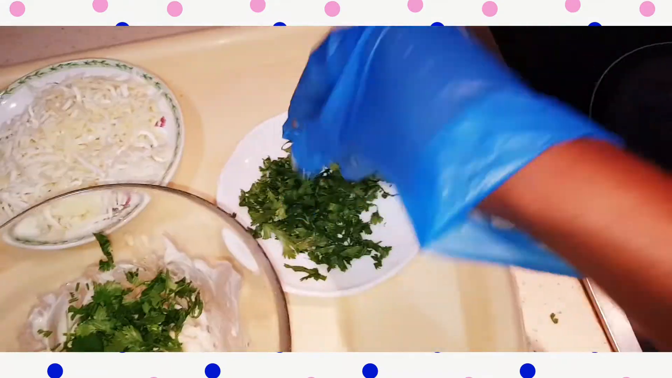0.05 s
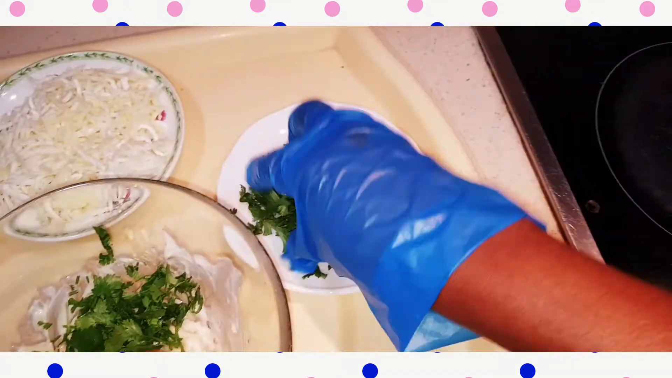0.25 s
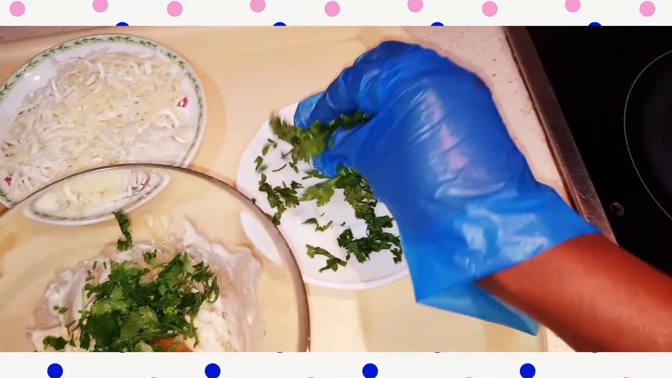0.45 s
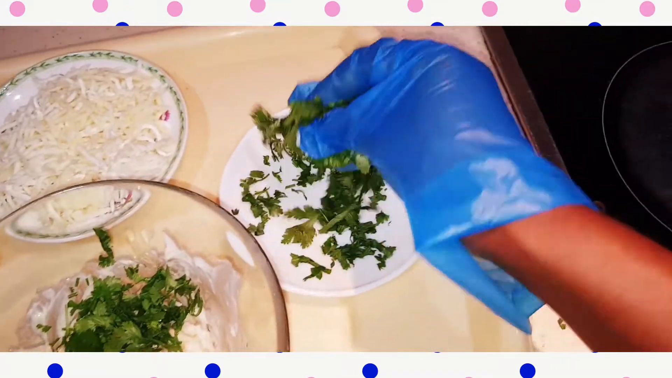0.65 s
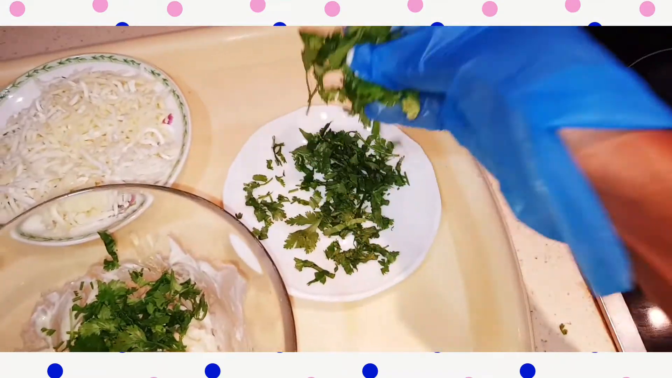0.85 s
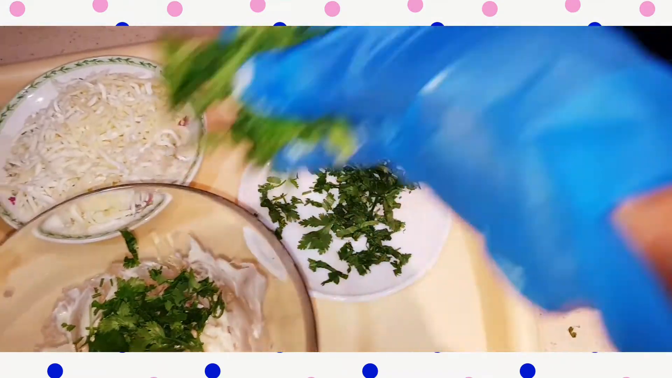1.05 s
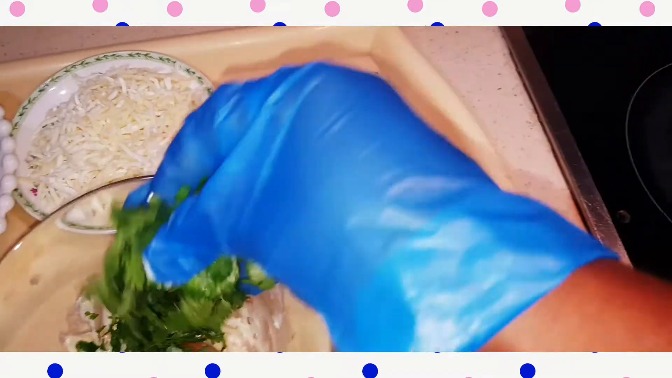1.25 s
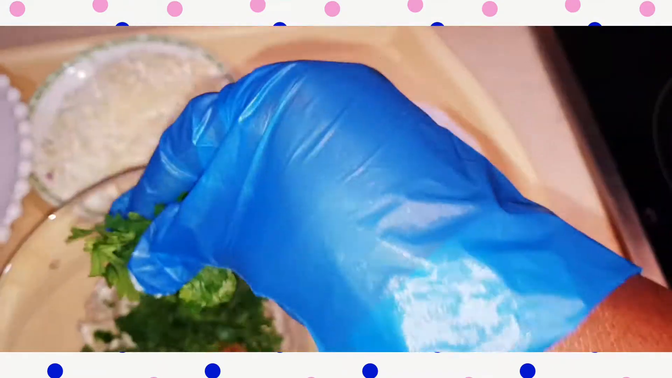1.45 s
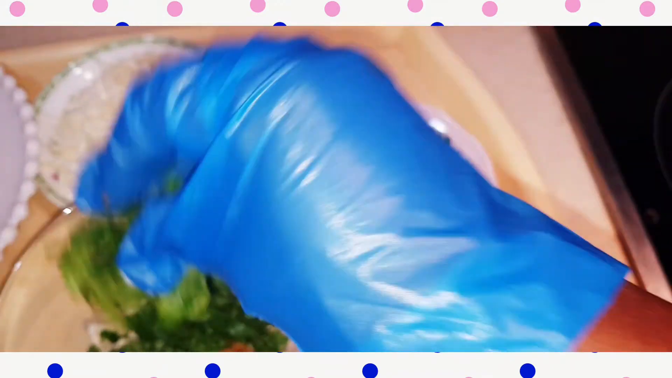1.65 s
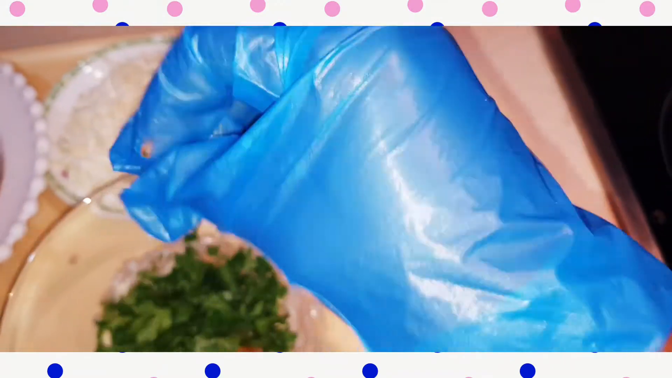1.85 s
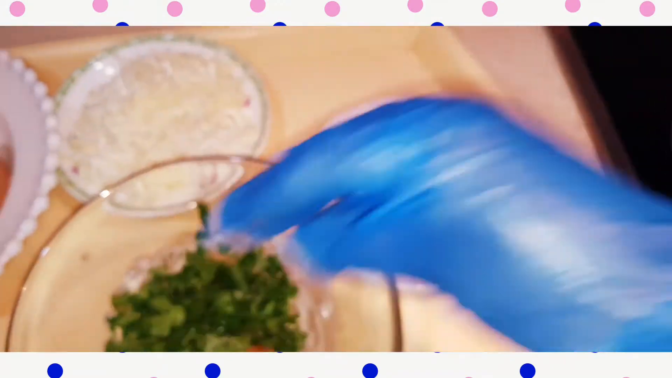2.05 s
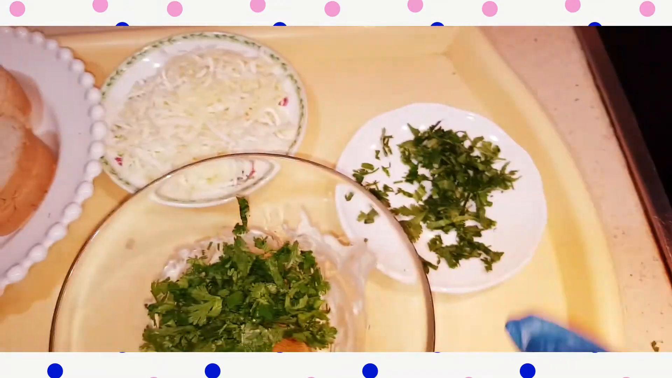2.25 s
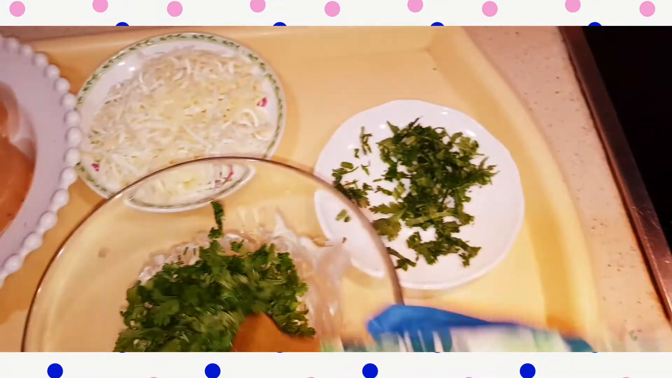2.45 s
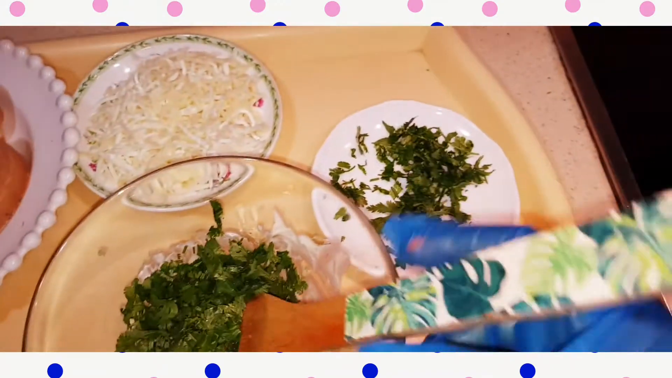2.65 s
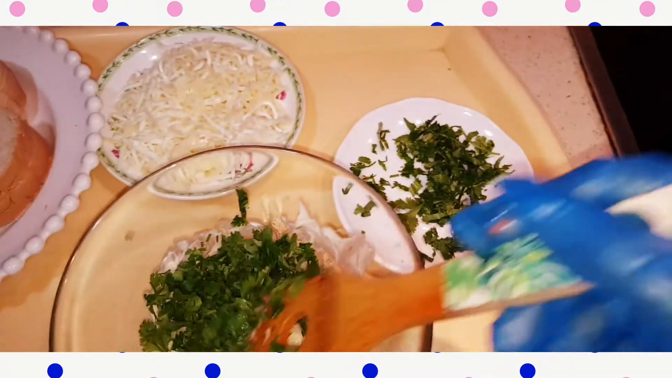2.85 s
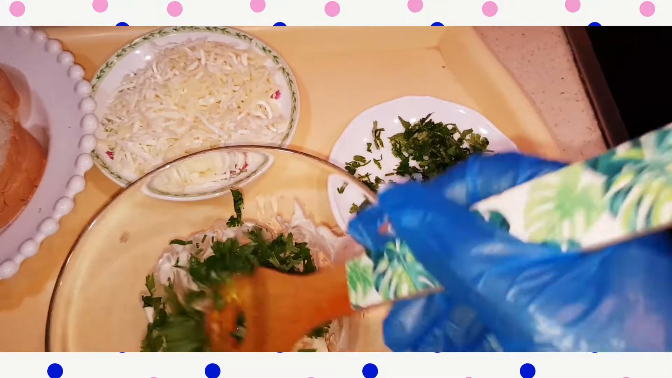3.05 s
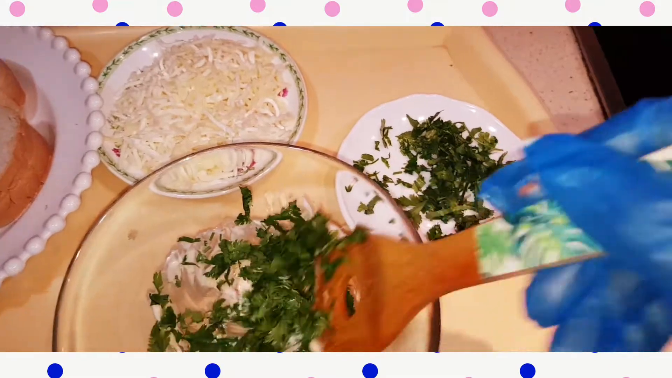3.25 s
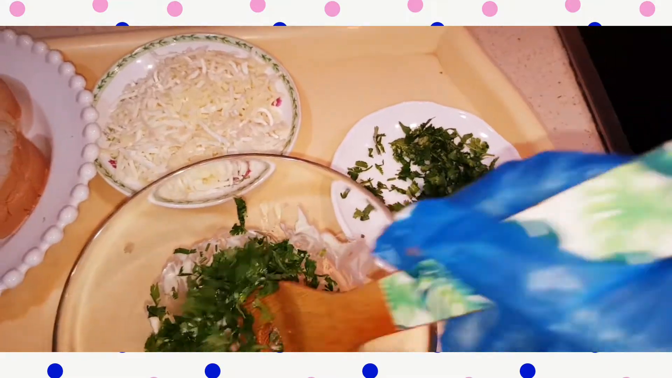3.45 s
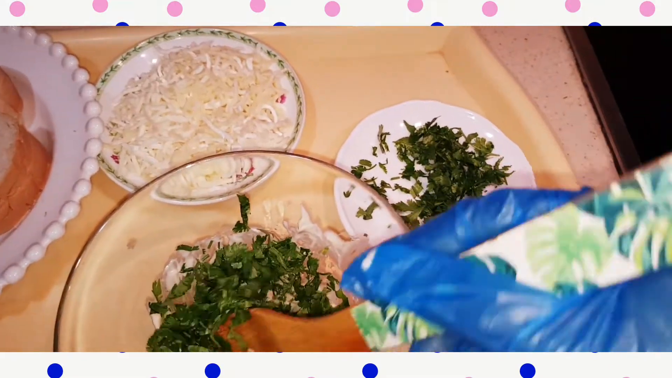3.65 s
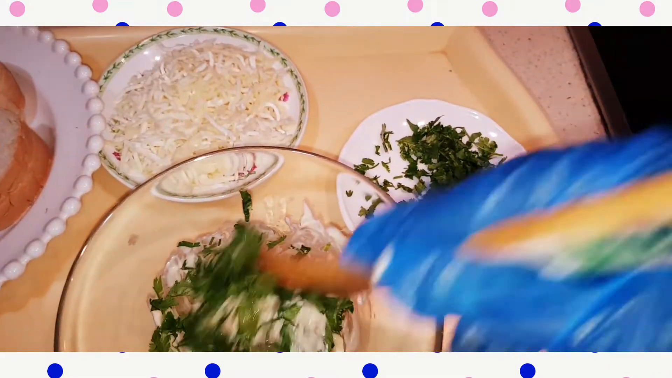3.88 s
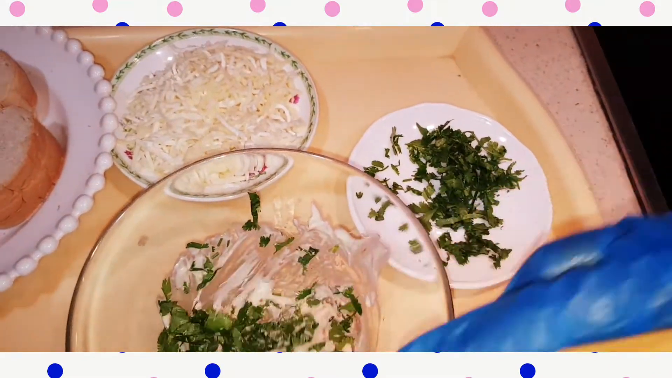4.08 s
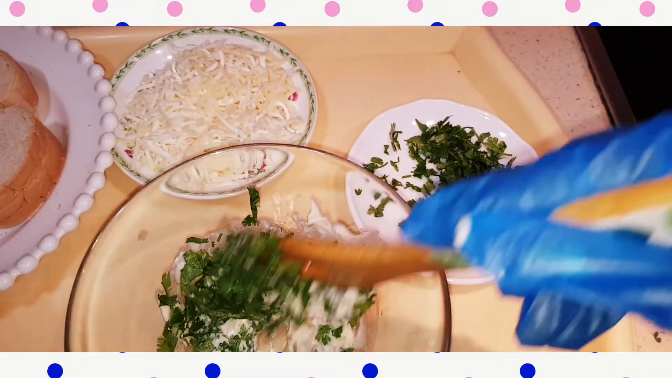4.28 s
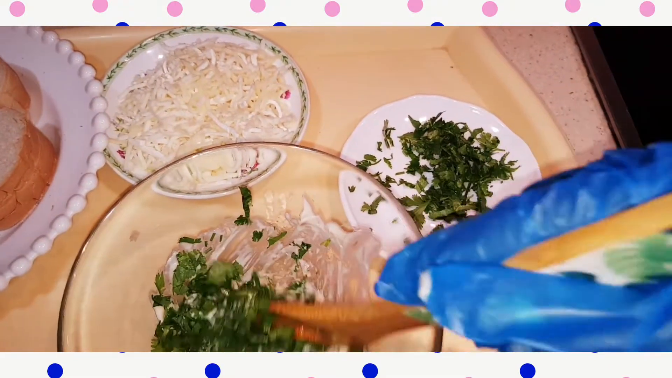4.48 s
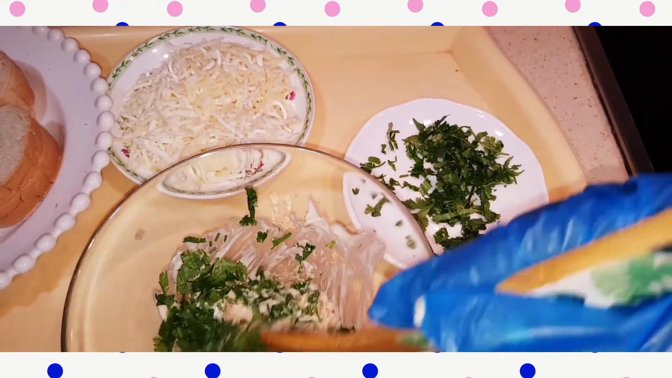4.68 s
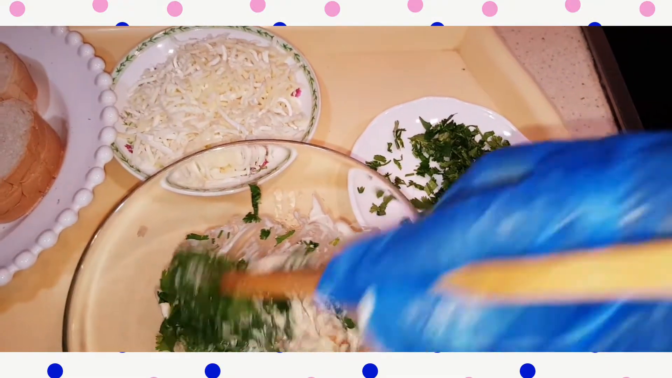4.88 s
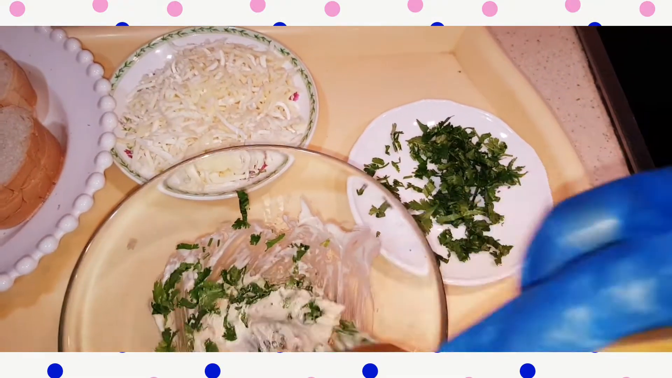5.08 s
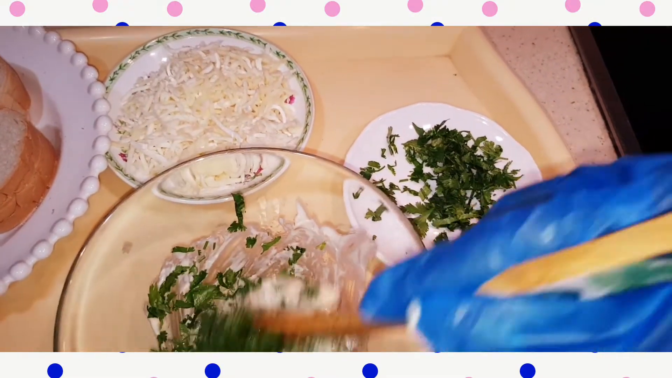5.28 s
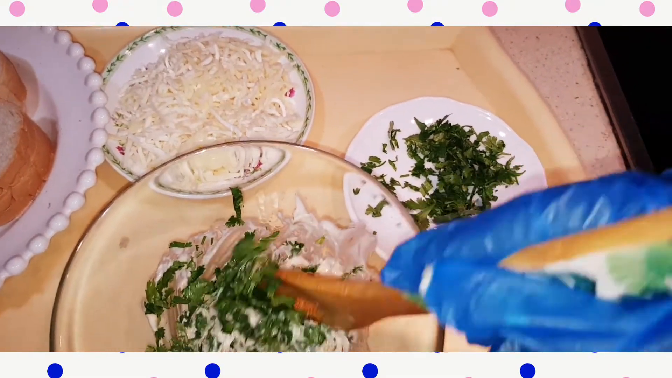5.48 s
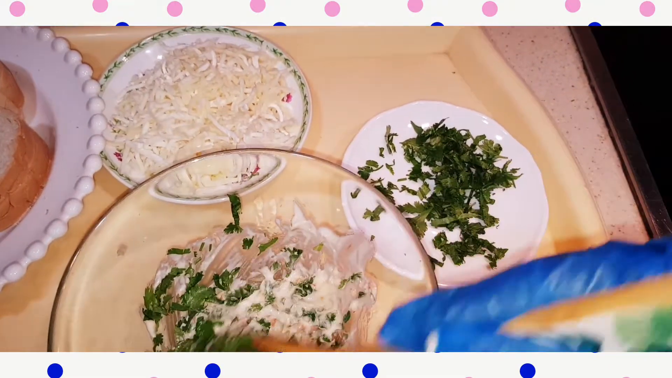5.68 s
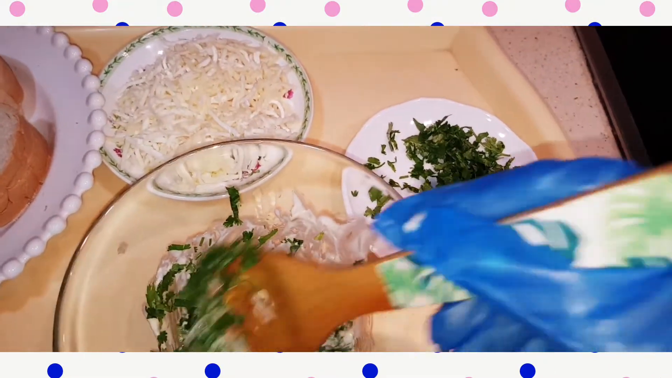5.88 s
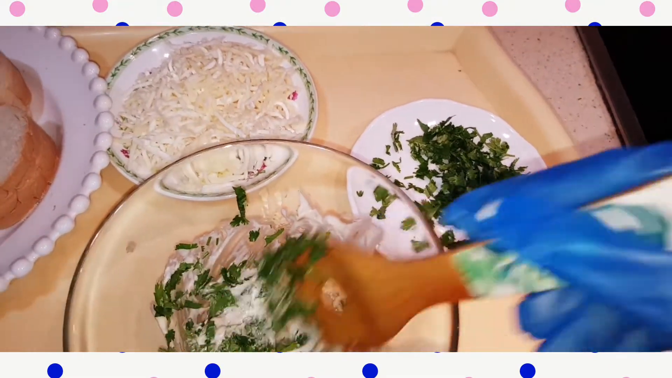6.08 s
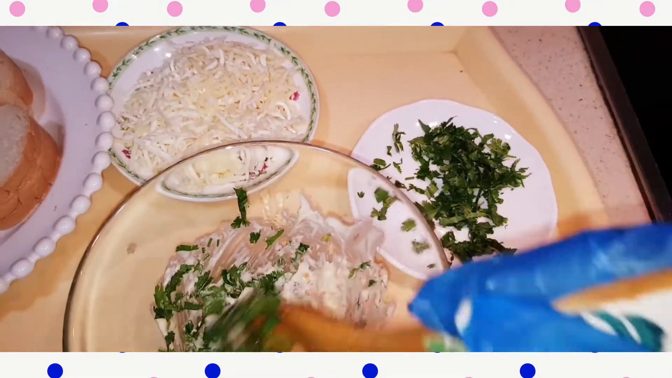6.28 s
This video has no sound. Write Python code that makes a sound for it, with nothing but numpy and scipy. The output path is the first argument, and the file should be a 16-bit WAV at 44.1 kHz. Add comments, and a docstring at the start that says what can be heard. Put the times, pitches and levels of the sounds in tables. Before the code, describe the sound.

In a small kitchen with a faint appliance hum, a plastic glove rustles near the microphone, slightly to the left, handling herbs. Then a wooden spatula knocks irregularly against a glass bowl as it works through a thick mixture. The first strokes bring short ringing clinks; the later ones are mostly lighter taps and thuds, mixed with soft rubbing and small crackles from the glove.

```python
"""Herbs stirred in a glass bowl

A gloved hand drops herbs into a glass bowl, then stirs a thick mix with a wooden spatula. The blade
thuds on the loaded bowl, the handle taps the rim, the bare rim rings until the spatula damps it.
The plastic glove rustles and snaps, fingers brush a saucer; an appliance hums across the small kitchen."""
import sys
import numpy as np
from scipy import signal
from scipy.fft import rfft, irfft, next_fast_len
from scipy.io import wavfile
from scipy.ndimage import uniform_filter1d, map_coordinates

SR = 44100
rng = np.random.default_rng(int(sys.argv[2]) if len(sys.argv) > 2 else 0)


def inscribe(sig):
    """Save sig as 16-bit PCM at rate SR to the path in sys.argv[1].

    A 1-D sig is mono; a 2-D sig holds one channel per row.
    Samples are clipped to [-1, 1] before scaling.
    """
    pcm = np.round(np.clip(np.atleast_2d(sig).T, -1, 1) * 32767)
    wavfile.write(sys.argv[1], SR, pcm.astype(np.int16))


N = 279005
TIME_S = np.arange(N) / SR
STIR_S = 2.9  # spatula enters the mix

# Spatula contacts. Each row: start in seconds, thud in dB, tap in dB, thud pitch in Hz.
CONTACTS = [(2.943, -25, -15.5, 576), (3.2455, -11.5, -17.5, 568), (3.27, -25, -31, 570),
            (3.293, -35, -15, 525), (3.341, -27, -27, 605), (3.367, -32.5, -19, 720),
            (3.412, -32.5, -39, 605), (3.439, -36, -34, 553), (3.471, -40, -39, 613),
            (3.545, -32, -21.5, 1003), (3.592, -32, -14, 700), (3.637, -32.5, -37, 620),
            (3.662, -46, -23.5, 580), (3.667, -32, -39, 556), (3.708, -32, -44, 627),
            (3.738, -37, -31, 544), (3.763, -25.5, -6.5, 984), (3.855, -34, -53, 656),
            (3.879, -32, -15, 666), (3.931, -31.5, -31, 580), (3.948, -39, -27.5, 804),
            (3.997, -32.5, -38, 618), (4.027, -41, -32, 553), (4.077, -35.5, -31, 626),
            (4.117, -37, -19, 733), (4.184, -39, -22, 737), (4.266, -51, -30.5, 570),
            (4.316, -45.5, -27, 605), (4.349, -43, -39, 1015), (4.385, -51, -30, 740),
            (4.431, -40, -64, 616), (4.491, -45.5, -53, 596), (4.58, -39.5, -27.5, 536),
            (4.618, -37.5, -19, 730), (4.684, -47.5, -22, 564), (4.751, -50.5, -30.5, 566),
            (4.821, -41.5, -50, 536), (4.868, -51, -28.5, 560), (4.927, -49, -36, 775),
            (4.958, -47.5, -58, 616), (5.106, -40.5, -29.5, 950), (5.133, -30, -27, 628),
            (5.158, -37, -21.5, 750), (5.226, -39.5, -23, 720), (5.292, -45.5, -28, 757),
            (5.382, -41, -35, 553), (5.425, -34.5, -16, 735), (5.469, -28.5, -27.5, 622),
            (5.498, -40, -22.5, 546), (5.56, -58, -28.5, 557), (5.585, -25, -29, 560),
            (5.607, -28.5, -32, 680), (5.629, -40, -20.5, 546), (5.63, -23.5, -43, 552),
            (5.665, -25, -28, 640), (5.7, -30.5, -16.5, 556), (5.767, -47, -27.5, 780),
            (5.89, -55, -26, 750), (5.955, -65, -23.5, 540), (6.183, -38, -20, 734),
            (6.213, -41.5, -39, 610), (6.249, -43.5, -23.5, 575), (6.32, -51, -26, 570)]
# Glove creases. Each row: start in seconds, level in dB, pitch in Hz, left over right in dB.
SNAPS = [(0.161, -40, 6850, 5.0), (0.234, -39, 11600, -1), (0.5288, -40.5, 6300, 11),
         (0.629, -61.5, 2580, 18), (1.0091, -40.5, 6110, 12), (1.0793, -43, 4420, 14),
         (1.776, -38, 6300, 7), (1.795, -44, 6500, 12), (1.837, -38, 1700, 2), (1.8583, -37, 11200, 6.0),
         (2.048, -31.5, 12300, 2), (2.108, -38, 13500, 6), (2.13, -44, 5500, 7), (2.182, -41, 9500, 5),
         (2.2172, -30, 10100, -2), (2.273, -27.5, 4470, 0.0), (2.3015, -31, 6430, -1),
         (2.312, -39, 11000, -5), (2.373, -35.5, 4770, 3), (2.4007, -35, 6570, 0), (2.613, -37, 1830, 1),
         (2.62, -34, 1950, 4), (2.6162, -26, 13400, -4), (2.706, -35, 4960, 6), (2.9397, -35.5, 6200, 6),
         (3.0272, -47.5, 8000, 29), (3.2443, -22.5, 6180, 10), (3.279, -37.5, 4600, 4),
         (3.512, -45, 7260, 14), (3.545, -25.5, 4720, 17), (3.629, -36, 6300, 9), (3.654, -38, 13400, 18),
         (3.676, -43, 12900, 28), (3.728, -36.5, 7400, 10), (3.641, -35, 5400, 15), (3.686, -45, 8000, 15),
         (3.778, -45, 6900, 10), (4.016, -41.5, 13200, 38), (4.027, -41.5, 8050, 21),
         (4.167, -46, 5430, 16), (4.176, -42, 12600, 13), (4.1865, -38, 14700, 15), (4.205, -35, 14500, 30),
         (4.216, -35, 12300, 25), (4.2277, -42.5, 13000, 45), (4.2612, -30, 15100, 17),
         (4.2773, -32.5, 10600, 29), (4.2985, -38.5, 5960, 10), (4.3155, -38, 13500, 12),
         (4.311, -31, 14600, 12), (4.477, -43, 13300, 12), (4.576, -30.5, 5060, 11),
         (4.719, -40, 13600, 16), (4.8104, -44, 12350, 9.0), (4.969, -44, 12700, 24),
         (4.991, -37.5, 12200, 26), (5.106, -30, 6390, 13), (5.1562, -33, 4620, 12),
         (5.2046, -33.5, 12600, 18), (5.2195, -35, 14000, 20), (5.385, -37, 6740, 20),
         (5.4263, -36.5, 4730, 2), (5.4582, -34.5, 4800, 17), (5.463, -39.5, 8800, 18),
         (5.468, -27.5, 13100, 20), (5.5824, -41.5, 6070, 28), (5.7169, -37, 5580, 19),
         (5.775, -32.5, 15200, 17), (5.81, -37, 14100, 13), (5.928, -38, 9400, 3), (5.946, -42, 11900, 11),
         (5.966, -46, 6700, 6), (6.114, -36.5, 7700, 15)]
# Pushes through herbs and mix. Each row: start and length in seconds, rub in dB, glove drag in dB.
STROKES = [(1.746, 0.085, -61.5, -8), (2.018, 0.18, -65.5, -4), (2.275, 0.07, -55.5, -8),
           (2.388, 0.36, -65.5, -3), (2.959, 0.094, -53, -14), (3.224, .13, -59, -15.5),
           (3.51, 0.17, -56, -9), (3.765, 0.14, -52.5, -5.5), (4.028, 0.38, -61, -8),
           (4.576, 0.049, -64, 0), (4.795, 0.12, -57, -1.5), (5.103, 0.1, -57, 0.5), (5.34, 0.14, -63, -5),
           (5.569, 0.13, -57.5, -2), (5.814, 0.15, -64.5, 1), (6.118, 0.52, -63, -3.5)]
# Balance of glove and mix. Each row: frequency in Hz, left over right in dB.
HAND_PAN = [(60, 3.5), (240, 2.5), (950, 5), (3770, 3.5), (15000, 11)]


def amp(db):
    """dB to gain."""
    return 10 ** (np.asarray(db) / 20)


def unit(x):
    """Scale to rms 1."""
    return x / np.sqrt(np.mean(x ** 2) + 1e-20)


def along(points, hz):
    """Interpolate (Hz, value) points on a log frequency axis."""
    knots_hz, values = np.transpose(points)
    return np.interp(np.log(hz + 1), np.log(knots_hz + 1), values)


def pan_gains(db):
    """Left and right gains, db apart."""
    return amp(np.array([db / 2, -db / 2]))


def wobble(rate_hz):
    """Smooth random curve with knots at rate_hz."""
    return map_coordinates(rng.standard_normal(int(N * rate_hz / SR) + 4), [TIME_S * rate_hz])


def filtered(x, response):
    """Apply a complex response, a function of Hz."""
    size = next_fast_len(N + SR // 2)
    return irfft(rfft(x, size) * response(np.fft.rfftfreq(size, 1 / SR)), size)[..., :N]


def resonance(hz, centre_hz, width_hz):
    """Band-pass response of one mode."""
    return 1j * hz * width_hz / (centre_hz ** 2 - hz ** 2 + 1j * hz * width_hz)


def stereo(sources, spectrum, coherence, pan):
    """Mix two independent signals into a coloured stereo pair, mid at rms 1."""
    def colour(hz):
        angle = np.arccos(np.clip(along(coherence, hz), -1, 1)) / 2
        return amp(along(spectrum, hz)) * [np.cos(angle), np.sin(angle)]
    mid, side = filtered(np.array(sources), colour)
    both = filtered(np.array([mid + side, mid - side]), lambda hz: pan_gains(along(pan, hz)))
    return both / np.std(both.mean(axis=0))


def crackle(per_s, centre_hz, octaves, spread_db, grain_rms, cycles, samples):
    """White noise plus short wavelets of scattered pitch and level."""
    count = per_s * N // SR
    starts = (rng.random(count) * N).astype(int)
    gains = amp(spread_db * np.minimum(rng.exponential(size=count), 3.2))
    hz = np.clip(centre_hz * 2 ** (octaves * rng.standard_normal(count)), 300, 15500)
    turns = np.arange(samples) / SR * hz[:, None]
    wavelets = gains[:, None] * np.sin(2 * np.pi * turns) * turns ** 2 * np.exp(-2 * turns / cycles)
    index = starts[:, None] + np.arange(samples)
    grains = np.bincount(index.ravel(), wavelets.ravel(), N + SR)[:N]
    return grain_rms * unit(grains) + rng.standard_normal(N)


def ring(modes, t, scatter_db, detune):
    """Damped sines from (Hz, width Hz, dB) modes, level and pitch scattered, peak 1."""
    x = sum(amp(db + rng.normal(0, scatter_db)) * np.exp(-np.pi * width_hz * t)
            * np.sin(2 * np.pi * hz * rng.normal(1, detune) * t) for hz, width_hz, db in modes)
    return x / np.max(np.abs(x))


def trails(starts_s, levels_db, t60_s):
    """Power that jumps at each event and decays."""
    kicks = np.bincount((starts_s * SR).astype(int), amp(levels_db) ** 2, N)
    return signal.lfilter([1], [1, -amp(-120 / (t60_s * SR))], kicks)


def stroke_powers():
    """Rub power and glove drag power gain, summed over the pushes."""
    rise_db_per_s, fall_db_per_s = 518.5, 205.5
    start_s, length_s, rub_db, drag_db = np.transpose(STROKES)[:, :, None]
    shape_db = -rise_db_per_s * np.maximum(start_s - TIME_S, 0)
    shape_db -= fall_db_per_s * np.maximum(TIME_S - start_s - length_s, 0)
    return [np.sum(amp(db + shape_db) ** 2, axis=0) for db in (rub_db, drag_db)]


def add(track, start_s, sound):
    """Mix a sound into a stereo track."""
    track[:, round(start_s * SR):][:, :sound.shape[-1]] += sound


def kitchen_tail(samples):
    """Random stereo room response, energy about 1; each band decays at its own rate."""
    # Each row: frequency in Hz, T60 in seconds.
    decay = [(400, 0.12), (2000, 0.2), (8000, 0.055)]
    hz, t, bands = signal.stft(rng.standard_normal((2, samples)), SR, nperseg=256)
    tail = signal.istft(bands * amp(-60 * t / along(decay, hz)[:, None]), SR, nperseg=256)[1]
    return np.pad(tail / np.linalg.norm(tail[0]), ((0, 0), (130, 0)))


def place(track, start_s, x, pan_db, wet_db):
    """Add a panned sound and its wall reflections."""
    echo = signal.fftconvolve(x[None], kitchen_tail(SR // 7), axes=1)
    add(track, start_s, pan_gains(pan_db)[:, None] * x)
    add(track, start_s, amp(wet_db) * echo)


def background():
    """Far appliance hum, microphone hiss and a few faint peeps."""
    # Each row: frequency in Hz, relative density in dB.
    spectrum = [(12, -52), (20, -9.5), (111, -8.5), (184, -36), (218, 3), (251, -14), (332, -15),
                (428, -24.5), (772, -30), (1300, -30.5), (3000, -44), (7000, -46), (9000, -52),
                (16500, -46)]
    # Each row: frequency in Hz, left-right coherence.
    coherence = [(60, 1), (240, 0.89), (950, 0.15), (3770, 0.074), (15000, 0.29)]
    # Each row: frequency in Hz, left over right in dB.
    pan = [(60, 1.5), (380, 6.5), (2380, 3.5), (15000, -9.5)]
    # Each row: start and length in seconds, pitch in Hz, level in dB.
    peeps = [(0.384, 0.036, 2980, -75), (0.407, 0.06, 4850, -70), (0.815, 0.055, 4840, -72)]
    out = amp(-58.5) * stereo(rng.standard_normal((2, N)), spectrum, coherence, pan)
    for start_s, length_s, hz, db in peeps:
        t = np.arange(int(length_s * SR)) / SR
        envelope = amp(db) * np.sin(np.pi * (t / length_s) ** 0.5)
        drift_rad = np.cumsum(rng.normal(0, 0.041, len(t)))
        add(out, start_s, envelope * np.sin(2 * np.pi * hz * t + drift_rad))
    return out


def saucer():
    """Sliding fingers excite one mode of the china."""
    slide = np.interp(TIME_S, [1.0, 1.02, 1.26], [0, 1, 0])
    china = filtered(rng.standard_normal((2, N)), lambda hz: resonance(hz, centre_hz=2170, width_hz=90))
    return amp(-64) * slide * unit(china)


def counter_rumble():
    """The counter shakes under the bowl."""
    # Each row: time in seconds, level in dB.
    shake = [(0, -64.5), (2.9, -60.5), (3.0, -53.5), (3.4, -53), (4.5, -57), (5.05, -59.5), (5.15, -48),
             (5.4, -62.5), (5.65, -43), (5.8, -57), (6.33, -57)]
    spectrum = [(25, -28.5), (60, 7), (105, 0.5), (200, 0), (330, -13), (500, -82.5)]  # Hz, dB
    rumble = stereo(rng.standard_normal((2, N)), spectrum, coherence=[(100, 0.82)], pan=[(100, 4.8)])
    return amp(np.interp(TIME_S, *np.transpose(shake))) * rumble


def mix_rub():
    """Herbs and mix rub under hand and blade; a scrape trails each tap."""
    # Each row: frequency in Hz, gain in dB.
    spectrum = [(210, -27.5), (350, -2), (510, -1.5), (554, 3), (639, 0.5), (1030, -6.5), (1490, -1),
                (2660, -9), (4000, -18), (5200, -31.5), (8800, -120)]
    lumps = [crackle(200, 1500, octaves=.6, spread_db=3, grain_rms=rms, cycles=1.5, samples=240)
             for rms in (.2, .15)]
    paste = stereo(lumps, spectrum, coherence=[(500, 0.28), (2000, 0.055)], pan=HAND_PAN)
    contact_s, _, tap_db, _ = np.transpose(CONTACTS)
    rub, _ = stroke_powers()
    scrape = trails(contact_s, -37 + 0.54 * tap_db, t60_s=0.15)
    return np.sqrt(rub + scrape) * amp(0.18 * wobble(33)) * paste


def glove_rustle():
    """Dry plastic crinkles densely; pulled through the sticky mix it pops in sparse clicks."""
    # Each row: frequency in Hz, gain in dB.
    spectrum = [(500, -24.5), (1200, -6), (2500, -3), (3650, -5.5), (6920, -2.5), (8910, -11), (11700, -5),
                (15100, -7), (16500, -2)]
    # Hand movement. Each row: time in seconds, rustle before drag in dB.
    hand = [(0.08, -69.5), (0.175, -51), (0.25, -55.5), (0.45, -77.5), (0.97, -79.5), (1.07, -49.5),
            (1.14, -65.5), (1.257, -59), (1.33, -64), (1.66, -55.5), (1.74, -47), (1.86, -46),
            (1.95, -65.5), (2.05, -52), (2.37, -55), (2.42, -47.5), (2.48, -54.5), (2.621, -41.5),
            (2.67, -57), (2.87, -75), (2.96, -42), (6.33, -56.5)]
    # Slides along the handle. Each row: centre in seconds, level in dB.
    slides = [(2.222, -39), (2.314, -41), (3.549, -33.5), (3.517, -45), (3.65, -41.5), (4.076, -39.5),
              (4.17, -46), (4.271, -43), (4.315, -44), (4.349, -41.5), (4.89, -59), (5.109, -38),
              (5.384, -42), (5.569, -47), (5.948, -42), (6.146, -42)]
    resting_db, slide_half_s = -18, 0.0036
    is_dry = TIME_S < STIR_S
    folds = [crackle(850, 10000, octaves=.55, spread_db=4, grain_rms=rms, cycles=1.2, samples=80)
             for rms in (.5, .4)]
    pops = [crackle(320, 12500, octaves=.4, spread_db=4, grain_rms=rms, cycles=1.6, samples=80)
            for rms in (.9, .5)]
    film = stereo(np.where(is_dry, folds, pops), spectrum, coherence=[(5000, 0.022)], pan=HAND_PAN)
    contact_s, _, tap_db, _ = np.transpose(CONTACTS)
    snap_s, snap_db, snap_hz, _ = np.transpose(SNAPS)
    _, drag = stroke_powers()
    power = amp(np.interp(TIME_S, *np.transpose(hand))) ** 2
    power *= np.where(is_dry, 1, amp(resting_db) ** 2 + drag)
    crease_db = -24 + .8 * snap_db - 8 * np.log2(snap_hz / 6000)  # high snaps trail less rustle
    power += trails(snap_s, crease_db, t60_s=.06)
    power += trails(contact_s, tap_db - 60, t60_s=0.045)  # grip slips at each tap
    power += sum(amp(db) ** 2 * np.exp(-((TIME_S - centre_s) / slide_half_s) ** 2)
                 for centre_s, db in slides)
    clumps_db = np.where(is_dry, 1.8, 3) * wobble(50)
    return np.sqrt(power) * amp(clumps_db) * film


def glove_snaps():
    """Each crease gives a compact wavelet and a short fizz; high ones are dry clicks."""
    sigma_at_10khz_s, fizz_decay_s, fizz_width_hz = .00015, 0.0035, 2000
    out, t = np.zeros((2, N + SR)), np.arange(SR // 30) / SR
    fizz_envelope = np.exp(-t / fizz_decay_s) * np.minimum(t / .001, 1)
    for start_s, db, hz, pan_db in SNAPS:
        click = np.exp(-.5 * ((t - .001) / sigma_at_10khz_s) ** 2 * hz / 10000)
        flutter = unit(uniform_filter1d(rng.standard_normal(len(t)), int(SR / fizz_width_hz)))
        cut_db = min(-13 * np.log2(hz / 5000), 0)
        fizz = 0.6 * amp(cut_db) * flutter * fizz_envelope
        snap = amp(db) * (click + fizz) * np.sin(2 * np.pi * hz * t)
        place(out, start_s, snap, pan_db, wet_db=cut_db - 4)
    return out[:, :N]


def blade_grind():
    """The blade drags on the glass and excites the low modes of the loaded bowl."""
    # Each row: start and length in seconds, level in dB.
    drags = [(3.415, 0.035, -50), (4.799, 0.077, -53)]
    # Each row: frequency and width in Hz, gain in dB.
    modes = [(550, 80, 0), (790, 120, -7)]
    def bowl(hz):
        return sum((-1) ** k * amp(db) * resonance(hz, centre_hz, width_hz)
                   for k, (centre_hz, width_hz, db) in enumerate(modes))
    push = sum(amp(db) * np.sin(np.pi * np.clip((TIME_S - start_s) / length_s, 0, 1)) ** .5
               for start_s, length_s, db in drags)
    return push * amp(1.5 * wobble(60)) * unit(filtered(rng.standard_normal(N), bowl))


def rim_ring():
    """The free rim rings and its close mode pairs beat until the spatula chokes it."""
    # Each row: start and choke time in seconds, low modes in dB, high modes in dB, twin offset in dB.
    clinks = [(2.941, 3.25, -37, -41, 0), (3.246, 3.553, -46, -65, -3), (3.771, 3.879, -45.5, -46.5, 9),
              (3.878, 4.227, -43.5, -62, -5)]
    # Mode frequencies in Hz; the first four form two close pairs.
    modes_hz = [775, 779, 1806.5, 1805, 2120, 2490, 3070]
    # Each row: level in dB, T60 in seconds, left over right in dB, left lead in radians, 1 if a twin.
    modes = [(1.5, 1, 1, .4, 0), (-11.5, 1, -10, 1, 1), (9, 1, 9, -0.024, 0), (5.5, 0.2, -10.5, -.8, 1),
             (12, 0.019, 12, 0.15, 0), (-4, 0.036, 4, 0, 0), (-11, .3, -8, 0, 0)]
    rise_s, choke_t60_s = 0.002, 0.05
    out, t = np.zeros((2, N + SR)), np.arange(SR // 2) / SR
    for start_s, choke_s, low_db, high_db, twin_db in clinks:
        choke = amp(-60 * np.maximum(t - (choke_s - start_s), 0) / choke_t60_s)
        gate = choke * (1 - np.exp(-t / rise_s))
        for hz, (db, t60_s, pan_db, lead_rad, is_twin) in zip(modes_hz, modes):
            strike_db = (low_db if hz < 1000 else high_db) + db + is_twin * twin_db
            envelope = amp(strike_db - 60 * t / t60_s) * gate
            phase = 2 * np.pi * hz * t + np.array([[lead_rad], [-lead_rad]]) / 2
            add(out, start_s, pan_gains(pan_db)[:, None] * envelope * np.sin(phase))
    return out[:, :N]


def spatula_knocks():
    """Each contact thuds the loaded bowl and taps wood on the rim; harder blows are brighter."""
    # Loaded bowl. Each row: multiple of the thud pitch, width in Hz, level in dB.
    bowl_modes = [(1, 62, 5), (1.45, 120, 2.5), (1.8, 170, 5)]
    # Counter under the bowl. Each row: frequency and width in Hz, level in dB.
    counter_modes = [(119, 50, -16), (211, 45, -11)]
    # Wood on glass. Each row: frequency and width in Hz, level in dB.
    tap_modes = [(1341, 190, -27), (1536, 72.6, -2.5), (1761, 220, 4.5), (2076, 159, -1), (2447, 160, -14),
                 (3000, 230, -19), (3450, 300, -29.5)]
    shimmer_mode = (4530, 24, 0)  # thin glass, undamped by the mix: Hz, width in Hz, dB
    thud_rise_s, tap_rise_s = .0009, .0008  # wood sinks in softly
    thud_tilt, tap_tilt = 0.23, .12  # dB per octave per dB of strength
    out, t = np.zeros((2, N + SR)), np.arange(SR // 12) / SR
    for start_s, thud_db, tap_db, thud_hz in CONTACTS:
        loaded = [(ratio * thud_hz, width_hz, db + thud_tilt * (thud_db + 22) * np.log2(ratio))
                  for ratio, width_hz, db in bowl_modes]
        thud = ring(loaded + counter_modes, t, scatter_db=2, detune=.004)
        thud *= 1 - np.exp(-t / thud_rise_s)
        thud /= np.max(np.abs(thud))
        struck = [(hz, width_hz, db + tap_tilt * (tap_db + 18) * np.log2(hz / 1500))
                  for hz, width_hz, db in tap_modes]
        chatter = np.r_[1, .08 * rng.standard_normal(300) * np.exp(-t[:300] / .003)]  # uneven contact
        tap = np.convolve(ring(struck, t, scatter_db=2, detune=.012), chatter)
        tap = np.diff(tap)[:len(t)] * (1 - np.exp(-t / tap_rise_s))
        tap /= np.max(np.abs(tap))
        shimmer = amp(rng.normal(-29, 4)) * ring([shimmer_mode], t, scatter_db=0, detune=.001)
        knock = amp(tap_db - 4) * (tap + shimmer) - amp(thud_db) * thud
        place(out, start_s, knock, pan_db=rng.normal(0, 1.5), wet_db=-10)
    return out[:, :N]


def scene():
    """Sum of all sources; the bowl reaches the nearer left microphone first and louder."""
    # Each row: frequency in Hz, left over right in dB.
    bowl_pan = [(100, 5), (300, 2), (700, 7.5), (1300, 6), (2200, 1), (4500, 5), (12000, 7)]
    # Each row: frequency in Hz, left lead in radians.
    bowl_lead = [(100, 0.27), (600, 0.5), (1400, 1.6), (1980, 2.7), (2600, 1.2), (4570, 4)]
    def bowl_to_mics(hz):
        phase = np.array([[.5], [-.5]]) * along(bowl_lead, hz)
        return pan_gains(along(bowl_pan, hz)) * np.exp(1j * phase)
    bowl = filtered(spatula_knocks() + rim_ring() + blade_grind(), bowl_to_mics)
    return bowl + glove_snaps() + glove_rustle() + mix_rub() + counter_rumble() + saucer() + background()


def record(dry):
    """Microphone bass roll-off, then a steep band limit."""
    bass_hz, top_hz = 45, 15830
    thinned = filtered(dry, lambda hz: (1j * hz / (bass_hz + 1j * hz)) ** 2)
    return filtered(thinned, lambda hz: 1 / (1 + (hz / top_hz) ** 400))


dry = scene()
out = record(dry)
inscribe(out)
```